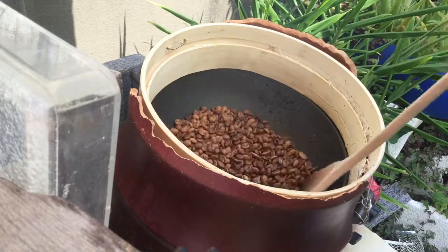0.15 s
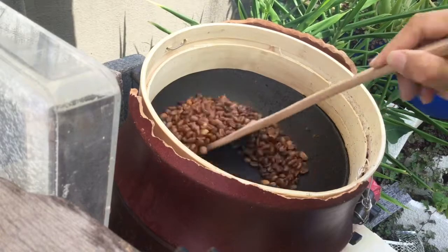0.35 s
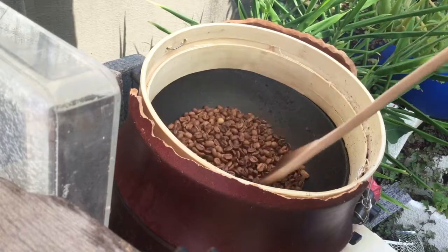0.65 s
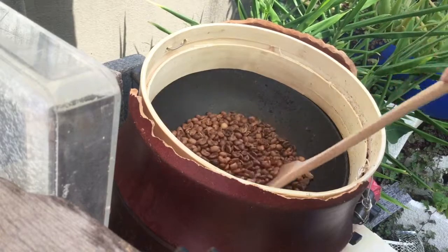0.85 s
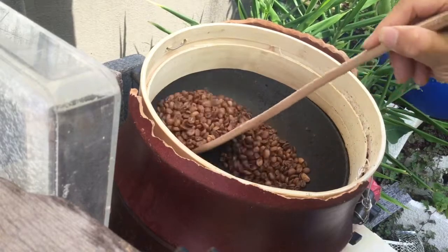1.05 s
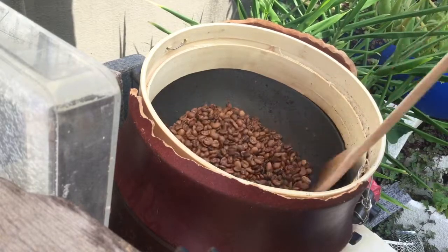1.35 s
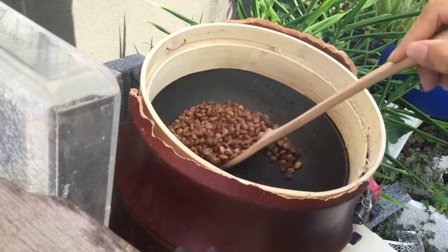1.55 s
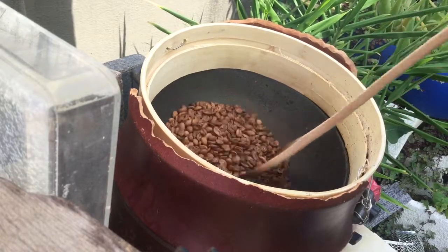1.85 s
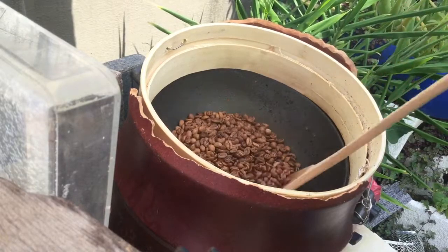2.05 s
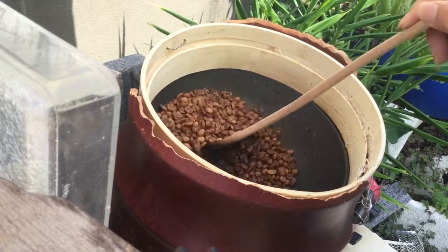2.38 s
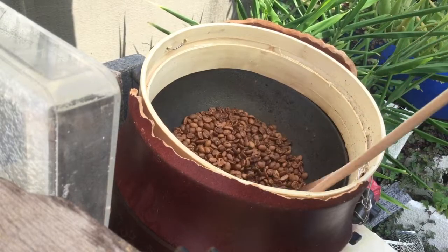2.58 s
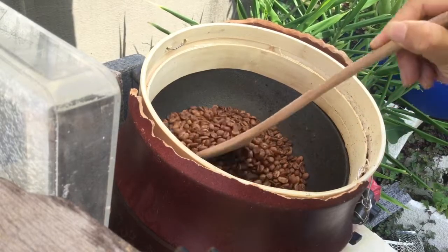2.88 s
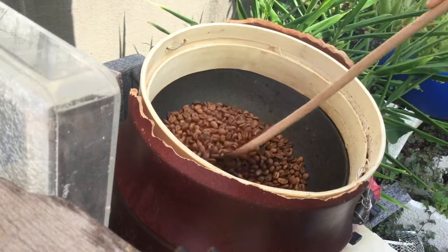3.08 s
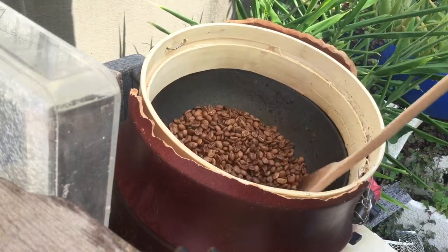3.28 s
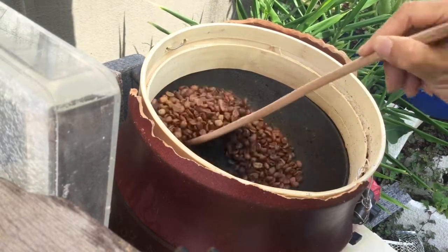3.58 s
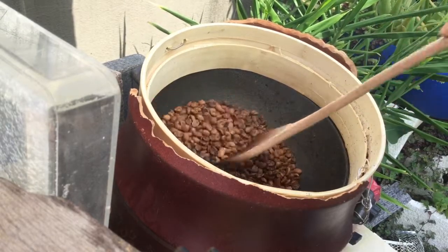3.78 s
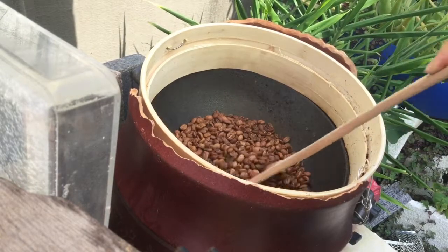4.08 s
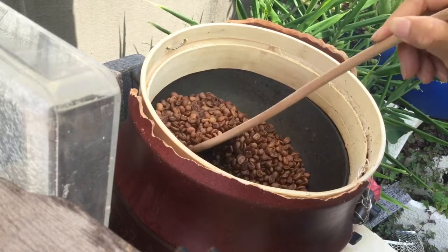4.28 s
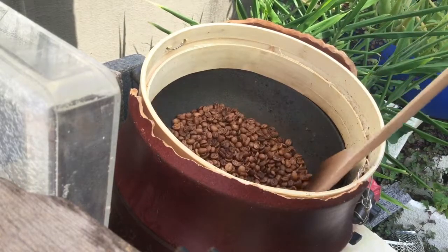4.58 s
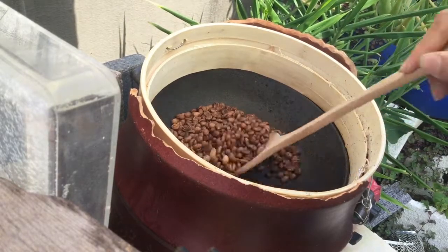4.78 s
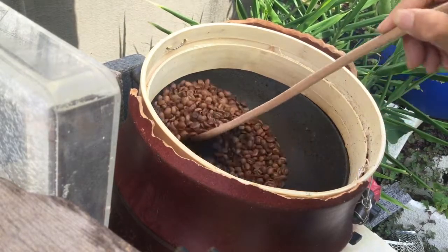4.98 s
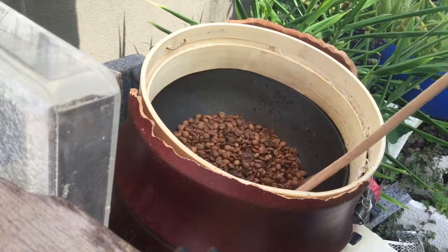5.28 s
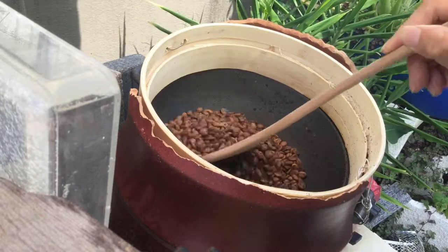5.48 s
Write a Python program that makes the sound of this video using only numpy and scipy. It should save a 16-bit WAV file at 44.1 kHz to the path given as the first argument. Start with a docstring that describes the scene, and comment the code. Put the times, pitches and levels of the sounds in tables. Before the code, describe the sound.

Short, regular stirring strokes: woody knocks on iron, then grainy crunches of hard beans, with faint metallic ringing and soft distant rumble.

```python
"""Outdoors, one microphone: a wooden spoon stirs roasting coffee beans in a cast iron pan with a wooden collar.
From the start a wavering low rumble with a trace of hiss lies underneath, and a distant drone swells, then eases.
The first push is already fading; from then on each stroke opens with noise-burst knocks ringing spoon and pan modes.
The edge drags, then the heap crunches (dense filtered clicks), folds over with a soft tumble and rings the iron
faintly as loose beans trickle back. Bounces, snapping beans and three stray beans fall in between."""
import sys
import numpy as np
from scipy import signal
from scipy.fft import rfft, irfft, next_fast_len
from scipy.io import wavfile
from scipy.ndimage import map_coordinates

SR = 44100
rng = np.random.default_rng(int(sys.argv[2]) if len(sys.argv) > 2 else 0)


def waveform_to_disk(signal):
    """Save audio, clipped to [-1, 1], as 16-bit WAV at the path in sys.argv[1]."""
    frames = np.transpose(np.atleast_2d(signal))
    scaled = np.clip(frames, -1, 1) * 32767
    samples = np.round(scaled).astype(np.int16)
    wavfile.write(sys.argv[1], SR, samples)


N = 248283  # samples

# Outdoor rumble and hiss, spectrum: f/Hz, relative level/dB
OUTDOOR_SPECTRUM = [(20, -50), (35, -22), (50, -8.5), (72, -0.5), (100, -5.5), (160, -11), (240, -12),
                    (330, -17), (460, -28), (800, -31.5), (2000, -41), (7000, -59), (12500, -40.5),
                    (15500, -55.5)]
# Distant drone, spectrum: f/Hz, relative level/dB
DRONE_SPECTRUM = [(70, -24), (110, -3), (160, -0.5), (230, -10), (330, -13.5), (500, -31.5), (1000, -57)]
# Distant drone, mean course before its wavering: t/s, level/dB
DRONE_LEVELS = [(0, -53.5), (0.7, -50.5), (1.3, -54.5), (3, -54.5), (4.6, -56.5), (5.63, -55.5)]
# Single beans dropping on bare iron: t/s, level of the clicks before filtering/dB
STRAY_BEANS = [(1.758, -49.5), (3.672, -43), (3.754, -53)]
# Heap folding over, spectrum: f/Hz, relative level/dB
TUMBLE_SPECTRUM = [(90, -16), (200, -17), (330, 2), (480, -9), (700, -8.5), (1200, -17), (3000, -28)]
# Wood ringing while it drags: f/Hz, width/Hz, relative level/dB
HANDLE_MODES = [(2310, 68, 6), (2455, 33, 16), (2860, 84, -21), (4100, 150, -31)]
# Free ringing of the iron: f/Hz, width/Hz, relative level/dB
IRON_MODES = [(2840, 17, -5), (3627, 25, 2.5), (4326, 48, 1.5), (4890, 16, -3), (5300, 41, -16),
              (5720, 15, -9.5), (6330, 35, -14), (7100, 28, -16), (9690, 110, -12.5)]
# Bean shells clicking, spectrum: f/Hz, relative level/dB
SHELL_SPECTRUM = [(800, -6.5), (2500, -0.5), (5300, 4.5), (7700, -2.5), (9300, 1), (13000, -2),
                  (14300, -4.5), (15800, -45)]
# Pressed beans crunching, spectrum: f/Hz, relative level/dB
CRUSH_SPECTRUM = [(150, -25), (350, 1), (600, -10.5), (850, -3.5), (1300, -2), (1700, 3), (3900, 5.5),
                  (4700, -5), (6500, -7.5), (8500, -4), (13000, -28), (16000, -38)]
# Pan resonances under the pressed heap: f/Hz, width/Hz, level over the plain crunch/dB
HEAP_MODES = [(1103, 66, 18), (1555, 88, 4), (1910, 21, 1), (2200, 92, 2), (2463, 57, 8), (2900, 120, -4),
              (3598, 73, 7), (4230, 220, -4.5), (5380, 320, 4.5), (6200, 330, 3.5)]
# One row per stroke: hardest push t/s, crunch level/dB, rise/s, fall/s, loose beans level/dB,
# tumble level/dB, trickle level/dB, back stroke level/dB (loose and trickle: before RATTLE_TRIM_DB)
STROKES = [(-0.21, -40, .13, .11, -48, -55, -64, -55), (0.388, -36, 0.14, 0.12, -44.5, -48.5, -58, -58),
           (0.997, -42.5, 0.14, 0.17, -47.5, -57, -60.5, -58),
           (1.608, -33.5, 0.094, 0.1, -42, -47, -60, -56), (2.261, -39, .18, 0.096, -45, -50, -58, -56),
           (2.879, -41.5, 0.1, .11, -48, -67, -75, -57.5),
           (3.537, -38.5, 0.17, .13, -48, -45.5, -57, -57.5), (4.177, -43, .15, 0.16, -51, -50.5, -65, -59),
           (4.835, -37.5, 0.12, 0.1, -47, -59.5, -59, -57.5), (5.515, -45, 0.22, 0.13, -53, -65, -62, -58)]
# Spoon and pan in contact: f/Hz, width/Hz, relative level before scatter/dB
SPOON_MODES = [(365, 29, -13), (673, 37, -6.5), (983, 78, -7), (1110, 180, -14), (1524, 420, -11),
               (1850, 37, -4.5), (2187, 88, -0.5), (2430, 190, -3.5), (2790, 59, -6), (3740, 81, -5.5),
               (4050, 67, 1.5), (4170, 200, -7.5), (4380, 31, -1.5), (4860, 20, -5.5), (5610, 60, -9),
               (5880, 52, -9), (6417, 54, 0), (7080, 15, -8.5), (8820, 83, -1), (9130, 180, -8.5),
               (10500, 170, -10), (11330, 120, -5.5), (12970, 120, -4)]
# Chatter of the contact, spectrum: f/Hz, relative level/dB
CONTACT_SPECTRUM = [(100, -39), (350, -0.5), (520, -20), (800, -4), (1200, -11), (1500, -4.5), (2400, 0.5),
                    (3200, -5.5), (4100, -2.5), (5200, -2.5), (7700, -7), (12500, -5.5), (15500, -15.5)]
# Spoon landing on the pan: t/s, level before colouring/dB, then colour: low boom/dB, thud/dB (before its
# own lift), woody ring/dB, clack/dB, crack/dB; contact/s, first touch ahead/s, first touch relative level/dB
LANDINGS = [(0.2362, -23, 3.5, 3.5, -1.5, 0, -1.5, 0.0041, 0.0025, -2.5),
            (0.8395, -24.5, -0.5, -5, -2.5, 1, -3, 0.003, 0.0074, -8),
            (1.458, -30, 13, 0.5, -3, -1.5, -5.5, 0.0019, 0.0028, 0),
            (2.069, -22.5, -1.5, 4, 8.5, -1, -1.5, 0.0028, 0.0027, -1.5),
            (2.697, -36.5, -13, -14, 3, 2, -1, 0.0044, .003, -3.5),
            (3.3611, -19, -5, -0.5, 4.5, -0.5, 1.5, .0033, .0028, -6.5),
            (3.992, -36, -14, -7, -5.5, 2.5, -10.5, 0.0053, .003, -3),
            (4.651, -31, -11, -13, -0.5, 1, -3.5, 0.0038, .008, -7),
            (5.313, -36, 1, -4.5, 3.5, -0.5, 1.5, 0.0069, 0.0031, -6)]
# Spoon bouncing and touching again: t/s, level before colouring/dB
BOUNCES = [(0.864, -38.5), (1.513, -57), (2.1, -38), (2.718, -51.5), (4.007, -40.5), (4.022, -43.5),
           (4.688, -44), (4.73, -50)]
# Bean snapping out from under the spoon: t/s, level before colouring/dB
SNAPS = [(0.939, -49), (1.537, -44), (2.13, -46), (5.487, -39)]

TOP_HZ = 15650  # band limit of the microphone channel
TUMBLE_AT, TUMBLE_S = 0.61, 0.051  # share of the fall at which the heap folds over; half-width
# the edge drags on bare iron before the push; level relative to the crunch
DRAG_LEAD_S, DRAG_S, DRAG_DB = 0.08, 0.065, -16.5
# a push is this much weaker one rise before and one fall after its peak; roundness of the peak
PUSH_DROP_DB, PUSH_ROUND = 21, 1.4
# loose beans scatter just ahead of the hardest push, for this share of its time
SPRAY_LEAD_S, SPRAY_SPAN = 0.0047, 0.93
TRICKLE_AFTER_S, TRICKLE_S = 0.15, 0.17  # shoved beans trickle back down the pan
BACK_AFTER_S, BACK_S = 0.24, 0.089  # the spoon is drawn back lightly through the heap
ROLL_AFTER_S, ROLL_S, ROLL_DB = 0.28, 0.12, -65  # beans roll after the spoon as it is drawn back
REST_CRUNCH_DB, REST_RATTLE_DB = -78.5, -78  # the heap never quite comes to rest
RATTLE_TRIM_DB = 2.0  # added to all loose-bean clicks
TOUCH_THUD_DB, TOUCH_CRACK_DB = -0.5, 4  # the grazing first touch is thinner and brighter than the blow
# a bounce is dull and woody
BOUNCE_THUD_DB, BOUNCE_WOOD_DB, BOUNCE_CRACK_DB, BOUNCE_CONTACT_S = -1.5, 4, -8.5, 0.0051
SNAP_THUD_DB, SNAP_WOOD_DB, SNAP_CRACK_DB, SNAP_CONTACT_S = -12, -5, 0.5, 0.0053
MODE_SCATTER_DB = 0.5  # every contact shares its energy a little differently among the modes


def amp(db):
    """Amplitude factor of a level in dB."""
    return 10 ** (np.asarray(db) / 20)


def unit(x):
    """x scaled to rms 1."""
    return x / np.sqrt(np.mean(x ** 2) + 1e-20)


def slope(points, hz):
    """Gain of (Hz, dB) points joined on a log frequency axis."""
    f, db = np.transpose(points)
    return amp(np.interp(np.log(hz + 1), np.log(f), db))


def resonances(modes, hz):
    """Causal response of (Hz, width, dB) modes: each is a damped oscillator."""
    return sum(amp(db) * 1j * hz * w / (c * c - hz * hz + 1j * hz * w) for c, w, db in modes)


def filtered(x, response):
    """x times a response of frequency, padded so the tail does not wrap."""
    size = next_fast_len(len(x) + 8192)
    return irfft(rfft(x, size) * response(np.fft.rfftfreq(size, 1 / SR)), size)[:len(x)]


def wobble(rate):
    """A smooth random curve, rate knots a second."""
    knots = rng.standard_normal(int(N * rate / SR) + 4)
    return map_coordinates(knots, [np.arange(N) * rate / SR])


def drifting(x, depth):
    """All frequencies of x glide slowly up and down by a share of about depth."""
    place = np.arange(N) + np.cumsum(depth * wobble(7))
    return map_coordinates(x, [place], mode="mirror")


def swells(rows):
    """Bell-shaped gains from (s, dB, half-width s) rows, 17 dB down at the half-width."""
    t = np.arange(N) / SR
    return sum(amp(db) * np.exp(-2 * ((t - s) / width) ** 2) for s, db, width in rows)


def collisions(rate, spread_db):
    """Random clicks of uneven size, rate a second; denser passages are not louder; rms 1."""
    chance = np.clip(rate / SR, 1e-4, 1)
    size = amp(spread_db * np.clip(rng.standard_normal(N), -2, 2))
    struck = rng.random(N) < chance
    return unit(struck * rng.choice([-1, 1], N) * size / np.sqrt(chance))


def outdoors():
    """A wavering rumble with a trace of hiss, and a distant drone that swells early and then eases."""
    air = unit(filtered(rng.standard_normal(N), lambda hz: slope(OUTDOOR_SPECTRUM, hz)))
    drone = unit(filtered(rng.standard_normal(N), lambda hz: slope(DRONE_SPECTRUM, hz)))
    drone_db = np.interp(np.arange(N) / SR, *np.transpose(DRONE_LEVELS))
    return air * amp(-50.5 + 0.96 * wobble(5.2)) + drone * amp(drone_db + 2.4 * wobble(7))


def strays():
    """A lone bean skitters for a moment and rings the pan."""
    t = np.arange(N) / SR
    skitter = sum(amp(db - 60 * np.abs(t - s) / 0.072) * (t >= s) for s, db in STRAY_BEANS)
    clicks = skitter * collisions(rate=3000, spread_db=4)
    tilt = [(6000, 1.5), (11000, -13)]
    shell = filtered(clicks, lambda hz: slope(SHELL_SPECTRUM, hz) * slope(tilt, hz))
    return shell + amp(10) * filtered(clicks, lambda hz: resonances(IRON_MODES, hz))


def slumps():
    """The shoved heap folds over with a soft, low tumble of many collisions."""
    folds = [(s + TUMBLE_AT * fall, tumble_db, TUMBLE_S) for s, _, _, fall, _, tumble_db, *_ in STROKES]
    clicks = collisions(rate=1600, spread_db=4.5)
    return swells(folds) * unit(filtered(clicks, lambda hz: slope(TUMBLE_SPECTRUM, hz)))


def drags():
    """The edge sticks and slips on the rough iron, and each slip rings the wood."""
    scrapes = [(s - DRAG_LEAD_S, db + DRAG_DB, DRAG_S) for s, db, *_ in STROKES]
    slips = collisions(rate=600, spread_db=11)
    return swells(scrapes) * unit(filtered(slips, lambda hz: resonances(HANDLE_MODES, hz)))


def push(s, db, rise, fall):
    """Gain of one shove: it swells to its peak at time s and eases off."""
    t = np.arange(N) / SR - s
    return amp(db - PUSH_DROP_DB * np.abs(t / np.where(t < 0, rise, fall)) ** PUSH_ROUND)


def stirring():
    """Levels in dB of pressed heap and loose beans; the powers of push, trickle and back stroke add up."""
    crunch_power, rattle_power = amp(REST_CRUNCH_DB) ** 2, amp(REST_RATTLE_DB) ** 2
    for s, db, rise, fall, loose_db, _, trickle_db, back_db in STROKES:
        back = swells([(s + BACK_AFTER_S, back_db, BACK_S)])
        spray = push(s - SPRAY_LEAD_S, loose_db, SPRAY_SPAN * rise, SPRAY_SPAN * fall)
        trickle = swells([(s + TRICKLE_AFTER_S, trickle_db, TRICKLE_S)])
        roll = swells([(s + ROLL_AFTER_S, ROLL_DB, ROLL_S)])
        crunch_power = crunch_power + push(s, db, rise, fall) ** 2 + back ** 2
        rattle_power = rattle_power + spray ** 2 + trickle ** 2 + roll ** 2
    return 10 * np.log10(crunch_power), 10 * np.log10(rattle_power)


def iron(rate):
    """Beans land on different spots, so each mode of the pan gets its own pings and waxes and wanes."""
    ring = np.zeros(N)
    for pitch, width, db in IRON_MODES:
        pings = filtered(collisions(rate, spread_db=3.5), lambda hz: resonances([(pitch, width, 0)], hz))
        ring += amp(db + 2.3 * wobble(9)) * unit(pings)
    return unit(ring)


def shell_ticks(rate, life):
    """Each bean rings briefly at its own pitch; rate a second, life in s to fall 60 dB, rms 1."""
    draw = rng.random((int(rate * N / SR), 3))
    t = np.arange(400) / SR
    hz = 900 + 6000 * draw[:, 1:2]
    size = -np.log(1 - draw[:, 2:])
    rings = size * np.sin(2 * np.pi * hz * t) * amp(-60 * t / life)
    where = (draw[:, :1] * N).astype(int) + np.arange(len(t))
    return unit(np.bincount(where.ravel(), rings.ravel(), N)[:N])


def crunching(crunch_db):
    """Pressed beans grind with more collisions the harder the push, through heap and pan resonances."""
    clicks = collisions(rate=5000 * amp(0.34 * (crunch_db + 45.5)), spread_db=3.5)
    grinding = clicks + amp(-6.5) * shell_ticks(rate=2400, life=0.019)
    crunch = unit(filtered(grinding, lambda hz: slope(CRUSH_SPECTRUM, hz) * (1 + resonances(HEAP_MODES, hz))))
    # the resonances shift as the heap changes shape
    crunch = drifting(crunch, depth=0.015)
    # the heap yields in small slips
    return crunch * amp(crunch_db + 1.1 * wobble(70))


def rattling(rattle_db):
    """Loose beans click on each other, more often when they are livelier."""
    ticks = collisions(rate=7000 * amp(0.18 * (rattle_db + 59.5)), spread_db=2.5)
    gain = amp(rattle_db + RATTLE_TRIM_DB + 2.1 * wobble(90))
    return gain * unit(filtered(ticks, lambda hz: slope(SHELL_SPECTRUM, hz)))


def beans():
    """Faster stirring makes more and harder collisions; they sound through heap, shells and iron."""
    crunch_db, rattle_db = stirring()
    # rolling beans excite the iron, and the pressed heap damps it
    excitation = amp(-56.5 + 0.58 * (rattle_db + 60))
    damping = 1 + amp(0.45 * (crunch_db + 45))
    return crunching(crunch_db) + rattling(rattle_db) + iron(rate=220) * excitation / damping


def contacts():
    """Touch and blow per landing, bounces, snaps: (t/s, dB, boom, thud, wood, clack, crack dB, contact/s)."""
    rows = []
    for s, db, boom, thud, wood, clack, crack, contact, ahead, touch_db in LANDINGS:
        # the grazing touch lasts until the blow
        rows.append((s - ahead, db + touch_db, boom, thud + TOUCH_THUD_DB, wood, clack,
                     crack + TOUCH_CRACK_DB, ahead))
        rows.append((s, db, boom, thud, wood, clack, crack, contact))
    bounce = (BOUNCE_THUD_DB, BOUNCE_THUD_DB, BOUNCE_WOOD_DB, 0, BOUNCE_CRACK_DB, BOUNCE_CONTACT_S)
    snap = (SNAP_THUD_DB, SNAP_THUD_DB, SNAP_WOOD_DB, 0, SNAP_CRACK_DB, SNAP_CONTACT_S)
    return rows + [(s, db, *bounce) for s, db in BOUNCES] + [(s, db, *snap) for s, db in SNAPS]


def collar(x, t60, wet_db):
    """Sound bounces between pan and collar; the paths differ for every contact."""
    t = np.arange(SR // 16) / SR
    paths = rng.standard_normal(len(t)) * amp(-60 * t / t60)
    paths *= amp(wet_db) / np.linalg.norm(paths)
    paths[0] = 1  # direct sound
    return signal.fftconvolve(x, paths / np.linalg.norm(paths))[:len(x)]


def knock(contact):
    """The spoon chatters on the iron while it lands; power 1 until 1 ms after the contact."""
    t = np.arange(SR // 8) / SR
    contact = max(contact, 0.0008)
    pressing = amp(-60 * np.maximum(t - contact, 0) / 0.003)
    chatter = rng.standard_normal(len(t)) * amp(2.6 * rng.standard_normal(len(t))) * pressing
    chatter = collar(filtered(chatter, lambda hz: slope(CONTACT_SPECTRUM, hz)), t60=0.08, wet_db=-2)
    # the modes build up through the contact and then die freely
    build = np.minimum(t / contact, 1) ** 0.21
    free = np.maximum(t - contact * 0.76, 0)
    ring = np.zeros(len(t))
    for hz, width, db in SPOON_MODES:
        level = amp(db + MODE_SCATTER_DB * rng.uniform(-0.81, 1)) * np.sqrt(width)
        pitch = hz * (1 + rng.normal(0, 0.00089))
        ring += level * np.exp(-np.pi * width * free) * np.sin(2 * np.pi * (pitch * t + rng.random()))
    hit = unit(chatter) + amp(-1.5) * unit(build * ring)
    return hit / np.sqrt(np.mean(hit[t < contact + 0.001] ** 2))


def spoon():
    """Every landing, bounce and snap at the spoon; its colour depends on the spot and the angle of the blow."""
    out = np.zeros(N + SR)
    for s, db, boom, thud, wood, clack, crack, contact in contacts():
        colour = [(380, boom), (650, thud + 2.5), (950, thud + 3), (1400, 0), (1800, 0.0039),
                  (2200, wood), (2450, wood), (3100, 0), (4300, clack), (9000, crack)]
        hit = amp(db) * filtered(knock(contact), lambda hz: slope(colour, hz))
        out[round(s * SR):][:len(hit)] += hit
    return out[:N]


def scene():
    """Background, beans and spoon at one microphone."""
    return (outdoors() + strays() + slumps() + drags() + beans() + spoon())[None]


def record(dry):
    """The microphone channel passes next to nothing above its steep band limit."""
    return np.array([filtered(x, lambda hz: 1 / np.sqrt(1 + (hz / TOP_HZ) ** 160)) for x in dry])


dry = scene()
out = record(dry)
waveform_to_disk(out)
```